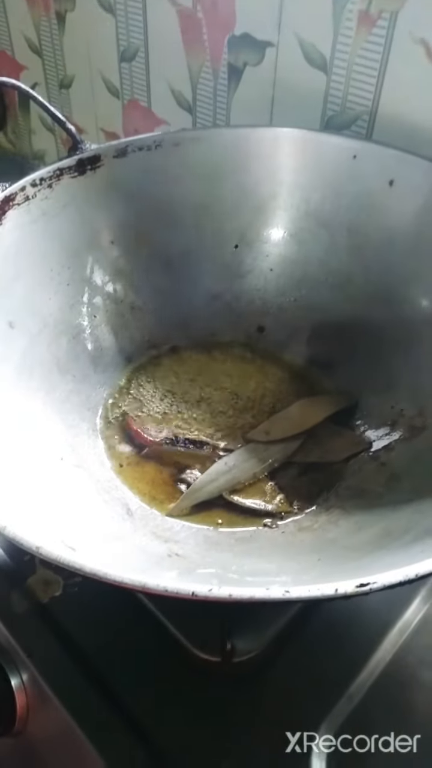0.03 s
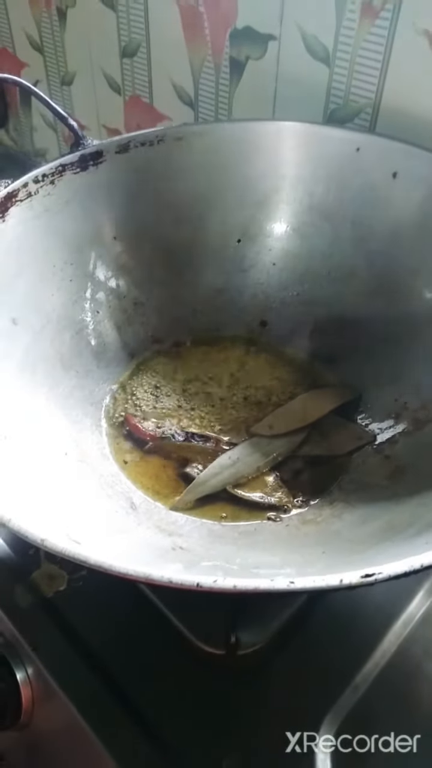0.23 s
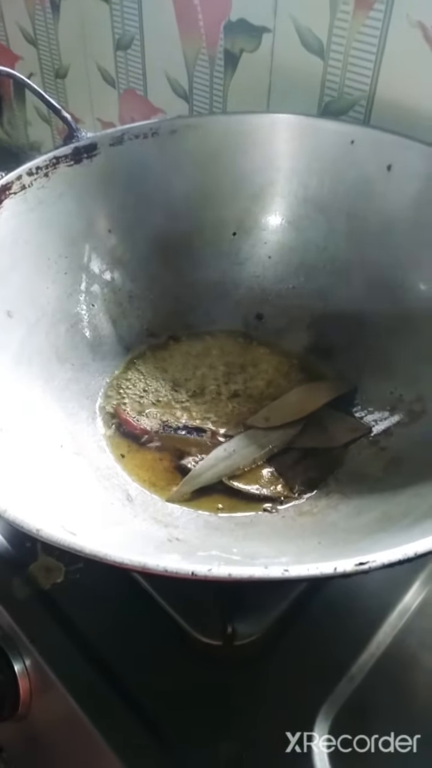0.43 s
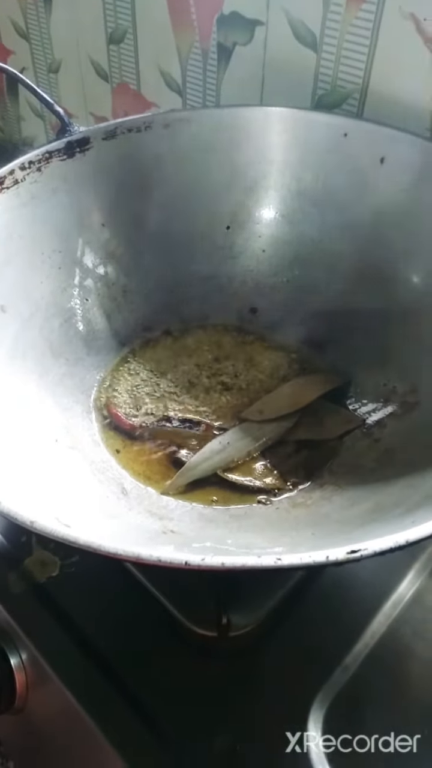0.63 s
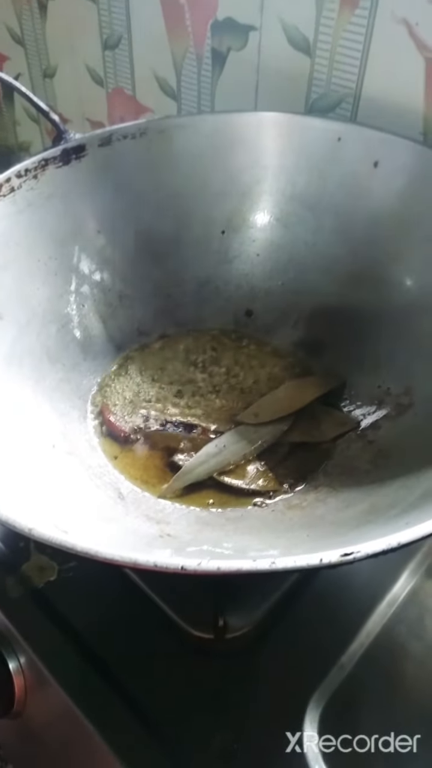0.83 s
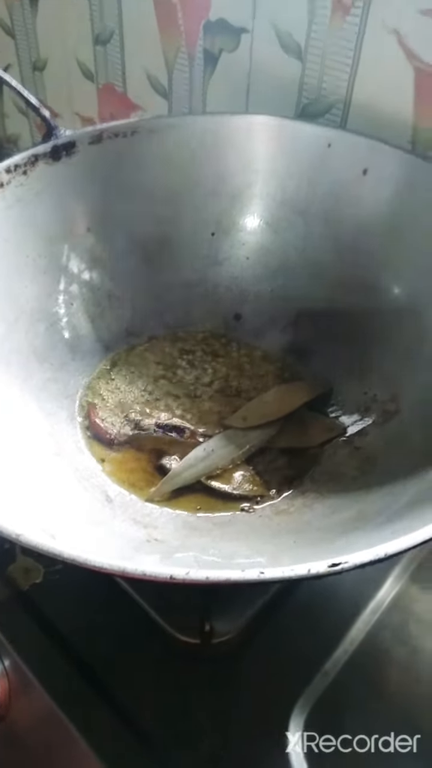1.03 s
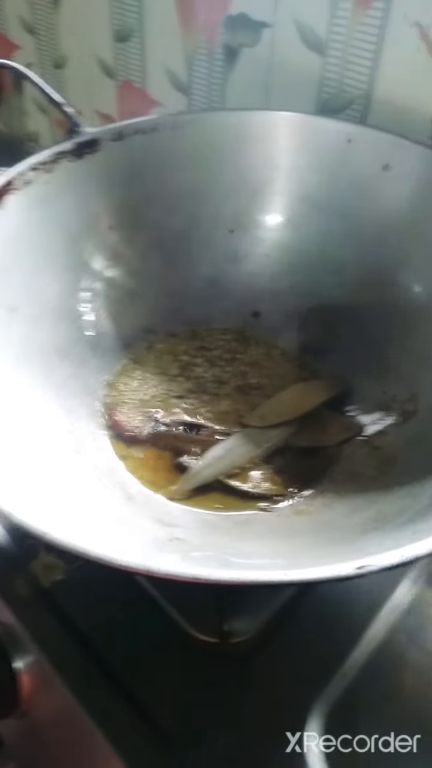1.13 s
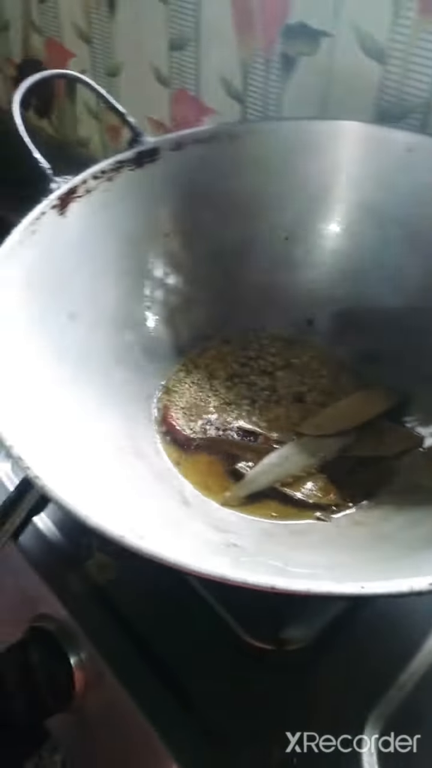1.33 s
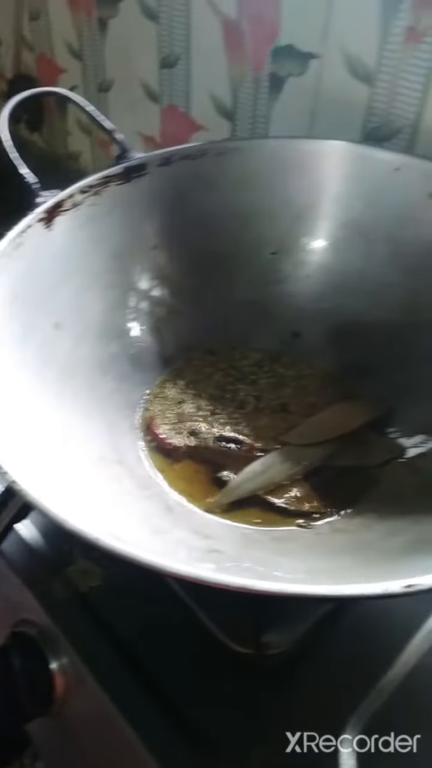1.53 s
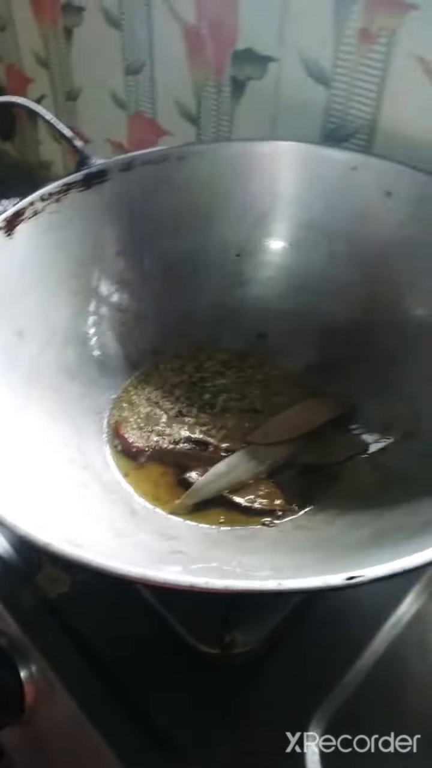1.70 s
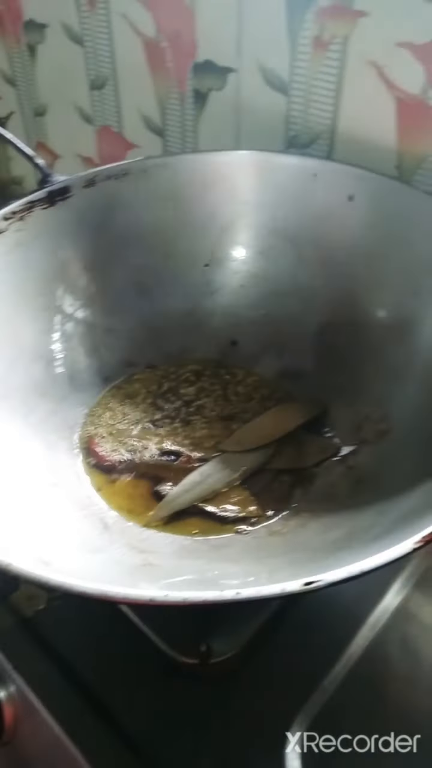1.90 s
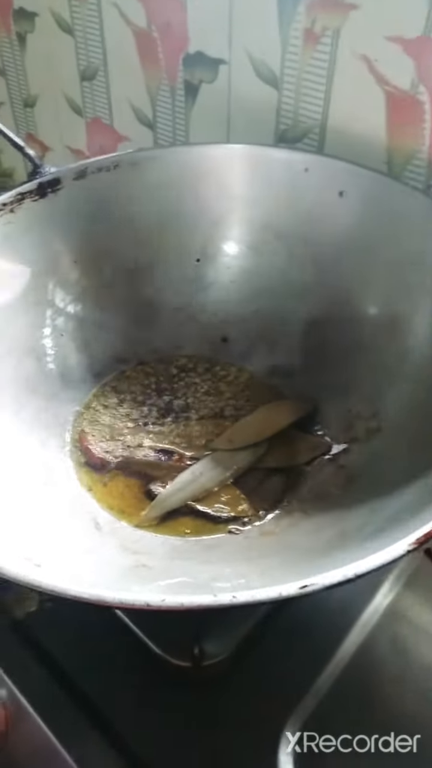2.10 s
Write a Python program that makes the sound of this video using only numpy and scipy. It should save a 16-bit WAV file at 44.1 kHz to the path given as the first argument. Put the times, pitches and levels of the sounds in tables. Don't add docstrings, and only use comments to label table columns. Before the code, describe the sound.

Seeds crackle in hot oil in a steel pan, close up in stereo. Lively sizzle and a spit open it, with a faint knock dying away; pops cluster from 0.1 to 0.55 seconds, then around 0.74 and 0.88 to 1.08. Separate cracks come near 1.2, 1.3, 1.5 and 1.63, a last cluster at 1.9, over calmer fizz, low flame rumble and short tiled-kitchen reflections.

```python
import sys
import numpy as np
from scipy import signal
from scipy.fft import rfft, irfft, next_fast_len
from scipy.io import wavfile

SR = 44100
rng = np.random.default_rng(int(sys.argv[2]) if len(sys.argv) > 2 else 0)


def unload_wav(signal):
    wavfile.write(
        sys.argv[1],
        SR,
        np.round(np.clip(np.atleast_2d(signal).T, -1, 1) * 32767).astype(np.int16),
    )


def field_ratio(decibels):
    return 10 ** (np.asarray(decibels, dtype=float) / 20)


N = 95079

SPOTS = 3
LEFT_LAG_S, WALL_S = 0.00014, 0.0042
ROOM_T60_DULL_S, ROOM_T60_BRIGHT_S = 0.27, 0.23
BRIGHT_TRIM_DB = 1


def rms_one(x):
    return x / np.sqrt(np.mean(x ** 2) + 1e-20)


def spectrum_hz(size):
    return np.arange(size // 2 + 1) * SR / size + 1


def colour(x, points):
    below, above = (points[0][0] * 0.9, -70), (points[-1][0] * 1.03, -70)
    hz, db = np.transpose([below, *points, above])
    size = next_fast_len(N + 4096)
    log_gain = np.log(field_ratio(np.interp(np.log(spectrum_hz(size)), np.log(hz), db)))
    cepstrum = irfft(log_gain, size)
    cepstrum[1:size // 2] *= 2
    cepstrum[size // 2 + 1:] = 0
    gain = np.exp(rfft(cepstrum))
    gain /= np.sqrt(np.mean(abs(gain) ** 2))
    return irfft(rfft(x, size) * gain, size)[..., :N]


def peak(x, hz, width_hz):
    r = np.exp(-np.pi * width_hz / SR)
    zeros = [(1 - r * r) / 2, 0, (r * r - 1) / 2]
    poles = [1, -2 * r * np.cos(2 * np.pi * hz / SR), r * r]
    return signal.lfilter(zeros, poles, x + 1e-18)


def narrow(hz, width_hz):
    return rms_one(peak(rng.standard_normal(N + 9000), hz, width_hz)[9000:])


def drift(hz):
    r = np.exp(-2 * np.pi * hz / SR)
    noise = rng.standard_normal(N + 9000)
    return rms_one(signal.lfilter([1], [1, -2 * r, r * r], noise)[9000:])


def grains(per_s, spread_db):
    shared = 0.096
    size = field_ratio(spread_db * np.minimum(rng.exponential(1, (3, N)), 4))
    size = size * rng.choice([-1, 1], (3, N))
    both, left, right = size * (rng.random((3, N)) < per_s / SR)
    return rms_one(np.sqrt(shared) * both + np.sqrt(1 - shared) * np.array([left, right]))


def click(s):
    return np.arange(N) == int(s * SR)


def burst(s, t60, rise, hold=0):
    t = np.maximum(np.arange(N) / SR - s, 0)
    return (1 - np.exp(-t / rise)) * field_ratio(-60 * np.maximum(t - hold, 0) / t60)


def room(x, t60):
    level_db, start_s = -3, 0.001
    early_db, early_t60_s = 6, 0.018
    t = np.maximum(np.arange(SR // 2) / SR - WALL_S, 0)
    late = field_ratio(-60 * t / t60)
    early = field_ratio(early_db - 60 * t / early_t60_s)
    tail = rng.standard_normal((2, len(t))) * (late + early) * (1 - np.exp(-t / start_s))
    tail /= np.sqrt(np.sum(tail ** 2, axis=1, keepdims=True))
    return field_ratio(level_db) * signal.fftconvolve(x, tail, axes=1)[:, :N]


def pipe_whines():
    # (time [s], length [s], from [Hz], to [Hz], level [dB])
    tones = [
        (0, 0.17, 475, 554, -52),
        (0, 0.068, 313.7, 300, -53),
        (0, 0.19, 395, 398, -65.5),
        (2.034, 0.32, 560, 598, -61),
    ]
    t, out = np.arange(N) / SR, 0
    for s, length, from_hz, to_hz, db in tones:
        u = np.clip((t - s) / length, 0, 1)
        hz = (from_hz + (to_hz - from_hz) * u) * (1 + 0.022 * drift(41))
        swell = np.sin(np.pi * u ** 0.63)
        out = out + field_ratio(db) * swell * np.sin(2 * np.pi * np.cumsum(hz) / SR)
    return out


def house_hum():
    # (frequency [Hz], level [dB])
    partials = [(92, -80), (199, -80), (297, -77.5), (549, -75)]
    return sum(field_ratio(db + 5) * narrow(hz, width_hz=9.2) for hz, db in partials)


def gas_flame():
    level_db, likeness = -65, 0.079
    # (frequency [Hz], density [dB per Hz])
    rumble = [(25, -5), (66, -6.5), (80, -0.5), (130, 1.5), (230, -6), (330, 0.5), (830, 1), (1600, -13)]
    mid, side = colour(rng.standard_normal((2, N)), rumble)
    wide = np.sqrt(1 - likeness) * side * [[1], [-1]]
    return field_ratio(level_db) * (np.sqrt(1 + likeness) * mid + wide)


def pan_knock():
    level_db, t60_s = -44.5, 0.42
    # (frequency [Hz], level [dB])
    modes = [(300, -7.5), (650, -4), (1600, 2.5)]
    clatter = sum(field_ratio(db) * narrow(hz, hz / 3) for hz, db in modes)
    return field_ratio(level_db - 60 * np.arange(N) / SR / t60_s) * clatter


def oil_fizz():
    # (time [s], level [dB])
    vigour = [
        (0.0, -34),
        (0.39, -34.5),
        (0.52, -36.5),
        (1.09, -36),
        (1.75, -40),
        (2.15, -39.5),
    ]
    # (frequency [Hz], density [dB per Hz])
    sizzle = [(900, -21), (2400, -13.5), (3500, -12.5), (4500, -7), (5500, -12.5), (9100, -2.5),
              (14200, -16.5), (14900, -36)]
    simmer_hz = [890, 1450, 2280, 3500, 5300]
    s, db = np.transpose(vigour)
    level_db = np.interp(np.arange(N) / SR, s, db) - 2.5 + 0.5 * (drift(6) + drift(69))
    bubbles = colour(grains(per_s=12000, spread_db=1), sizzle)
    for hz in simmer_hz:
        patches = field_ratio(-2 + 1.8 * drift(11))
        bubbles = bubbles + (patches - 1) * peak(bubbles, hz, hz / 3)
    return field_ratio(level_db) * bubbles


def air_thumps():
    # (time [s], level [dB])
    pushes = [(.145, -32), (0.2012, -35), (0.3264, -33), (.462, -30), (.4745, -58), (.5412, -36),
              (.7395, -27.5), (0.959, -32.5), (.976, -27), (1.037, -28.5), (1.210, -27.5), (1.3148, -31),
              (1.5134, -29), (1.628, -47), (1.9028, -31.5), (1.9255, -28.5), (1.954, -43)]
    puffs = sum(field_ratio(db + 18.5) * click(s) for s, db in pushes) * np.ones((2, 1))
    low_band = signal.butter(2, [403, 1600], "band", fs=SR, output="sos")
    puffs = signal.sosfilt(low_band, puffs + 1e-18)
    return puffs + field_ratio(-2) * room(puffs, ROOM_T60_DULL_S)


def droplet_ticks():
    ring_cycles, rise_cycles, level_db, room_db = 30, 2.5, 2.5, -5.5
    # (time [s], peak level [dB], pitch [Hz])
    droplets = [(.0078, -32, 9300), (.0612, -41, 4030), (.1102, -38, 8600), (.1242, -23, 3760),
                (.169, -14, 12700), (0.1734, -28, 9100), (.5418, -16, 4650), (0.547, -33, 4400),
                (0.9612, -35, 8700), (1.2144, -16, 9040), (0.187, -26, 9500), (.2125, -27, 4330),
                (0.214, -22, 3600), (0.2285, -34, 3480), (.3087, -35, 8700), (.3213, -26, 4380),
                (0.331, -16, 8400), (.4164, -47, 8500), (.4532, -51, 7150), (.4786, -14, 4660),
                (0.558, -30, 4560), (.567, -41, 4030), (.6434, -38, 8700), (.6665, -40, 10200),
                (.6789, -41, 8800), (.6848, -35, 8500), (0.707, -35, 8850), (0.745, -14, 8200),
                (0.748, -16, 3880), (0.8824, -14, 4360), (.8875, -20, 8600), (.971, -23, 8500),
                (.981, -28, 8400), (0.988, -24, 9200), (1.028, -15, 4390), (1.041, -26, 11500),
                (1.048, -30, 9130), (1.076, -27, 4400), (1.1364, -36, 8870), (1.1879, -36, 8270),
                (1.2855, -36, 8700), (1.295, -44, 7600), (1.3744, -41, 8440), (1.3857, -36, 8550),
                (1.4349, -33, 8440), (1.44, -30, 8870), (1.481, -33, 9100), (1.634, -25, 9600),
                (1.7245, -36, 8500), (1.7856, -32, 9200), (1.8455, -37, 8870), (1.908, -19, 4480),
                (1.9296, -18, 10080), (1.961, -18, 11900), (2.0055, -31, 7490), (2.04, -32, 7900)]
    out, t = np.zeros((2, N + 500)), np.arange(400) / SR
    for (s, db, hz), (turn, place) in zip(droplets, rng.random((len(droplets), 2))):
        shape = (1 - np.exp(-t * hz / rise_cycles)) * field_ratio(-60 * t * hz / ring_cycles)
        ring = shape / shape.max() * np.sin(2 * np.pi * (hz * t + turn))
        for side, late_s in zip(out, [LEFT_LAG_S * (1 + place) / 2, 0]):
            start = int((s + late_s) * SR)
            side[start:start + len(t)] += field_ratio(db + level_db) * ring
    out = out[:, :N]
    return out + field_ratio(room_db) * room(out, ROOM_T60_BRIGHT_S)


def steam_spits():
    level_db, t60_s, rise_s = -8.5, 0.043, 0.00049
    q, broad_db = 4.2, -9.5
    # (time [s], dull part [dB], its pitch [Hz], bright part [dB], hold [s])
    jets = [(.0, -12.5, 2830, -16.5, 0.0027), (.060, -27.5, 3960, -49, 0.009),
            (0.125, -23.5, 3760, -41, 0.0031), (0.159, -34, 4000, -35, 0.004),
            (0.202, -14.5, 3780, -51, 0.0099), (0.315, -20, 4600, -35, 0.0033),
            (0.328, -28.5, 4100, -18, 0.0083), (0.4737, -12, 3070, -28, 0.0038),
            (0.474, -18, 3900, -33, 0.0034), (0.526, -44, 4000, -32, 0.0074),
            (0.545, -21.5, 4700, -61.5, 0.0062), (0.733, -26.5, 3000, -25, 0.0031),
            (0.743, -13.5, 3130, -24, 0.0081), (0.881, -10.5, 4600, -23.5, 0.0014),
            (0.963, -19.5, 4470, -16.5, 0.0025), (0.979, -21, 4220, -17.5, 0.0061),
            (0.991, -20, 3850, -20.5, 0.01), (1.054, -47, 3500, -25, 0.0027),
            (1.073, -15.5, 4450, -25, 0.0052), (1.7, -41, 2000, -38, 0.0034),
            (1.833, -56, 3620, -36.5, .006), (1.907, -20.5, 3830, -22.5, 0.0033),
            (2.004, -28.5, 4250, -31, 0.0072), (2.035, -51, 4000, -29.5, 0.0027)]
    steam = grains(SR / 4, spread_db=2.5) * field_ratio(2.5 * drift(88))
    dull, bright = np.zeros((2, SPOTS, 2, N))
    for k, (s, dull_db, hz, bright_db, hold) in enumerate(jets):
        spit = field_ratio(level_db) * burst(s, t60_s, rise_s, hold) * steam
        pitched = peak(spit, hz, hz / q)
        dull[k % SPOTS] += field_ratio(dull_db) * (pitched + field_ratio(broad_db) * spit)
        bright[k % SPOTS] += field_ratio(bright_db + BRIGHT_TRIM_DB) * spit
    return np.array([dull, bright])


def husk_pops():
    crack_level_db, snap_db, spray_db, dull_trim_db = 8, 5, 1, -3.5
    lead_s, lead_db = 0.0071, -22
    wall_db, wall_pan_db = -9, 14.5
    # (time [s], dull part [dB], bright part [dB], crack over spray [dB], left over right [dB])
    husks = [(0.0968, -31, -33, -0.5, -3), (0.1311, -26, -29, 1, 1), (0.1441, -28.5, -21.5, -2.5, -7),
             (0.169, -20, -19, -4.5, 4), (0.2023, -13.5, -24.5, -4, -2), (.2536, -28, -28.5, -1, 1),
             (0.3258, -18.5, -18, 1, -3.5), (0.4626, -22.5, -22.5, 1, -4), (0.4742, -18, -35, 1, 1.5),
             (0.5417, -19.5, -26.5, 1, -2), (0.7397, -14.5, -19, -2, -3.5), (0.8832, -21, -28, -7, 7),
             (0.9585, -18.5, -19.5, -3.5, -6), (0.9756, -18, -29, -5, -2), (1.0228, -25.5, -24.5, 4, -2.5),
             (1.0368, -17.5, -18, -6.5, 1), (1.2105, -17, -14, -4.5, 2.5), (1.3149, -30.5, -21, 0, -1),
             (1.5136, -24, -19.5, 1, -2), (1.628, -18, -16, -7.5, -1), (1.9025, -19.5, -34, 3.5, -2),
             (1.9253, -25, -23.5, 0, 8.5), (1.955, -24.5, -22, 1, -3.5)]
    spray = grains(per_s=4500, spread_db=5)
    crack = grains(SR, spread_db=0.86)
    wall = field_ratio([[wall_db + wall_pan_db / 2], [wall_db - wall_pan_db / 2]])
    dull, bright = np.zeros((2, SPOTS, 2, N))
    t = np.arange(N) / SR
    for k, (s, dull_db, bright_db, crack_db, pan_db) in enumerate(husks):
        echo = wall * burst(s + WALL_S, 0.009408, 0.00039)
        rattle = burst(s, 0.004, 3e-5) + echo
        lead = field_ratio(lead_db) * (t < s) * np.exp(np.minimum(t - s, 0) / lead_s)
        pop = field_ratio(crack_level_db + crack_db) * (rattle * crack - field_ratio(snap_db) * click(s))
        pop = pop + field_ratio(crack_level_db) * lead * crack
        pop = pop + field_ratio(spray_db) * burst(s, 0.019, 0.0015) * spray
        pop = pop * field_ratio([[pan_db / 2], [-pan_db / 2]])
        dull[k % SPOTS] += field_ratio(dull_db + dull_trim_db) * pop
        bright[k % SPOTS] += field_ratio(bright_db + BRIGHT_TRIM_DB) * pop
    return np.array([dull, bright])


def seeds():
    # (frequency [Hz], density [dB per Hz])
    dull_colour = [(200, -44.5), (1000, -17.5), (1500, -16), (2260, -4.5), (3500, -3), (4550, 1.5),
                   (5000, -8), (6500, -7.5)]
    # (frequency [Hz], density [dB per Hz])
    bright_colour = [(2710, -21), (4600, -34), (5140, -10.5), (6220, -9.5), (9010, 0), (9810, -3.5),
                     (14000, -11.5), (15300, -23)]
    dull, bright = husk_pops() + steam_spits()
    dull = sum(spot + room(spot, ROOM_T60_DULL_S) for spot in dull)
    bright = sum(spot + room(spot, ROOM_T60_BRIGHT_S) for spot in bright)
    return colour(dull, dull_colour) + colour(bright, bright_colour)


def scene():
    background = pipe_whines() + house_hum() + gas_flame() + pan_knock()
    left, right = oil_fizz() + air_thumps() + seeds()
    left = np.interp(np.arange(N) - int(LEFT_LAG_S * SR), np.arange(N), left)
    return background + droplet_ticks() + np.array([left, right])


def roll_off(x):
    return signal.sosfilt(signal.butter(12, 15410, fs=SR, output="sos"), x)


def record(dry):
    sub_hz, top_hz, limit = 50, 15800, 0.93
    # (frequency [Hz], level [dB])
    ports = [(60, 5), (110, 13.5), (200, 14.5), (380, 11), (690, -5), (1280, -1), (2360, 1.5), (4350, 0.5),
             (8030, -6), (14800, 4)]
    hz, db = np.transpose([(sub_hz * 0.54, 0), *ports])
    size = next_fast_len(N + 4096)
    tilt_db = np.interp(np.log(spectrum_hz(size)), np.log(hz), db) / 2
    mix = irfft(rfft(dry, size) * field_ratio([tilt_db, -tilt_db]), size)[:, :N]
    mix = limit * np.tanh(mix / limit)
    mix = signal.sosfilt(signal.cheby2(8, 50, top_hz, fs=SR, output="sos"), mix)
    return roll_off(mix)


dry = scene()
out = record(dry)
unload_wav(out)
```